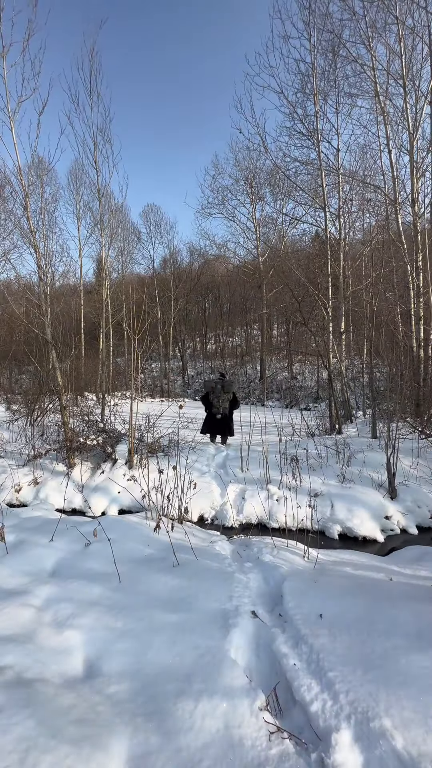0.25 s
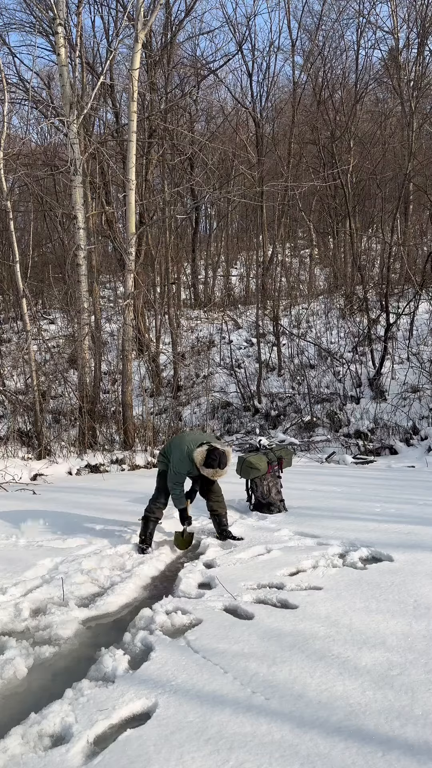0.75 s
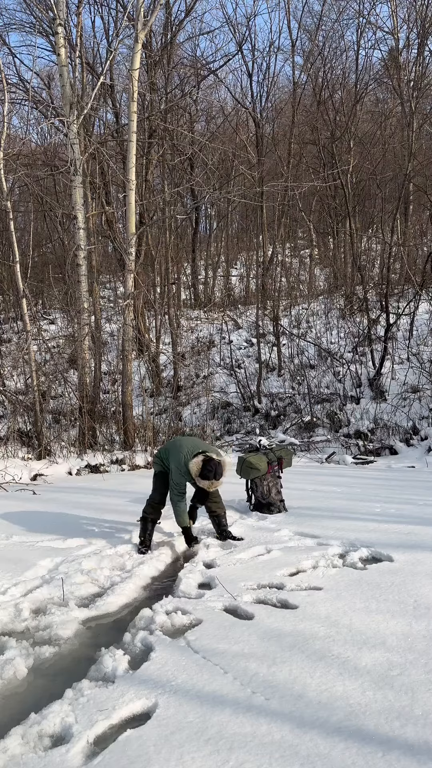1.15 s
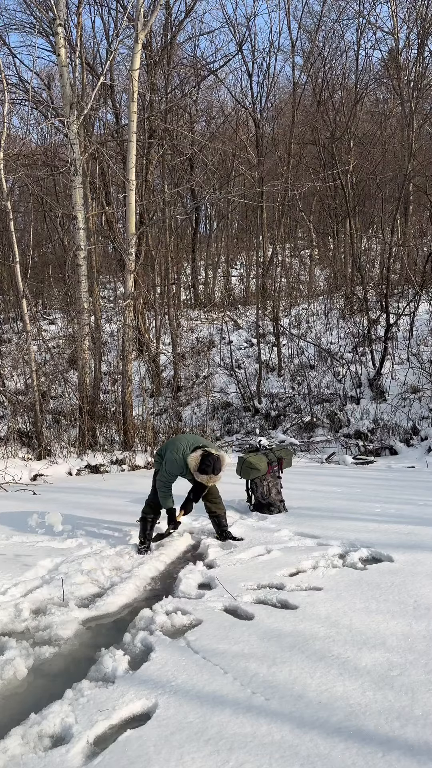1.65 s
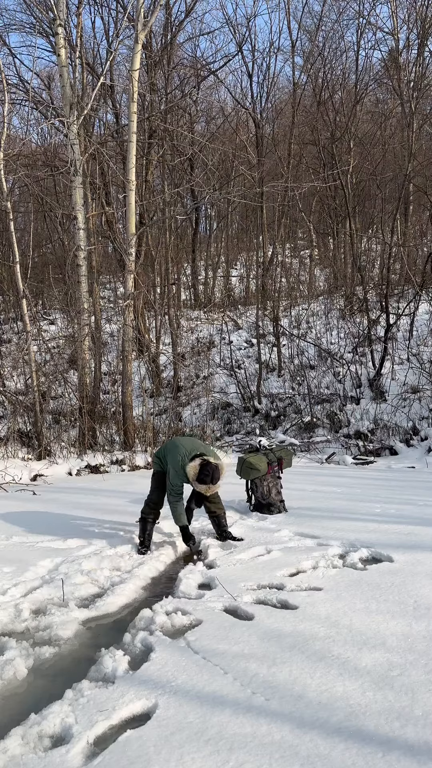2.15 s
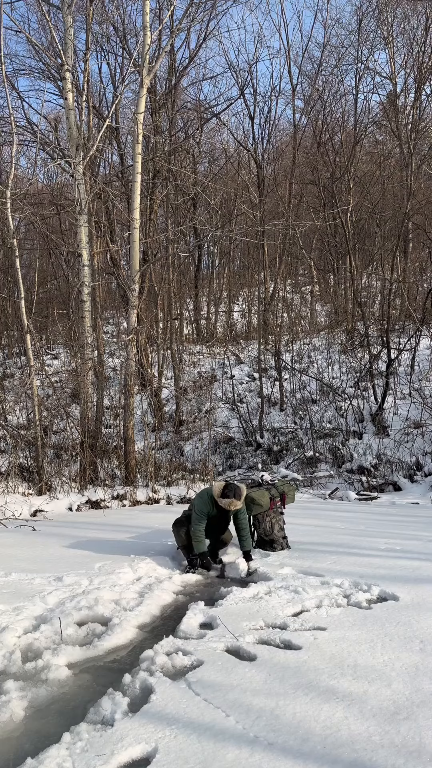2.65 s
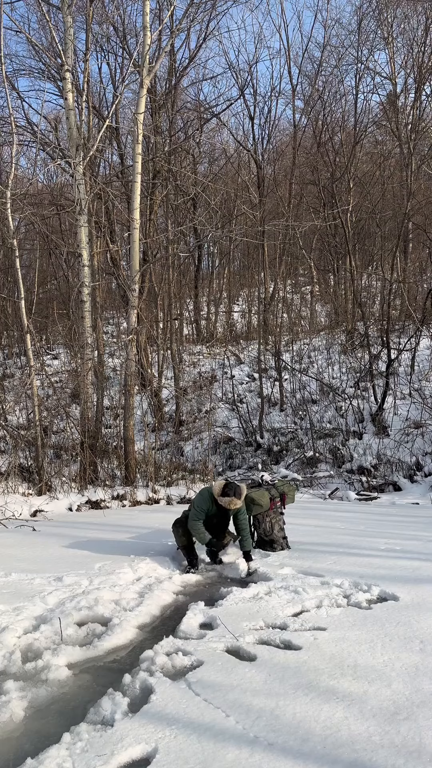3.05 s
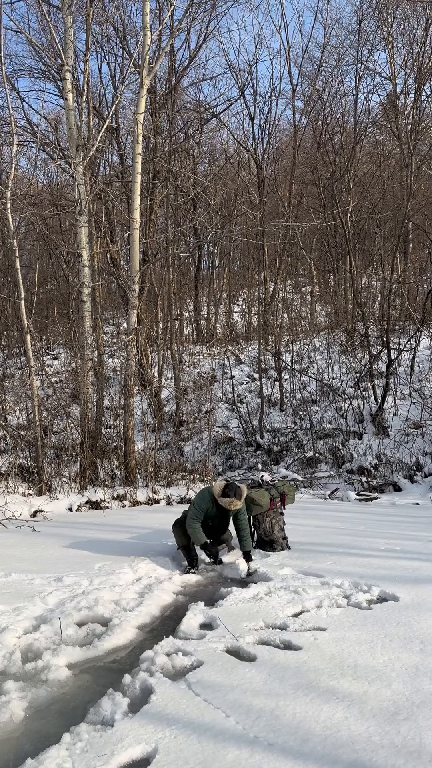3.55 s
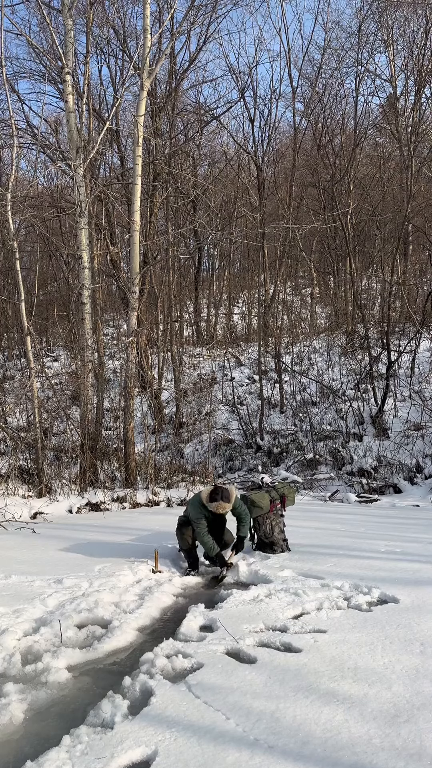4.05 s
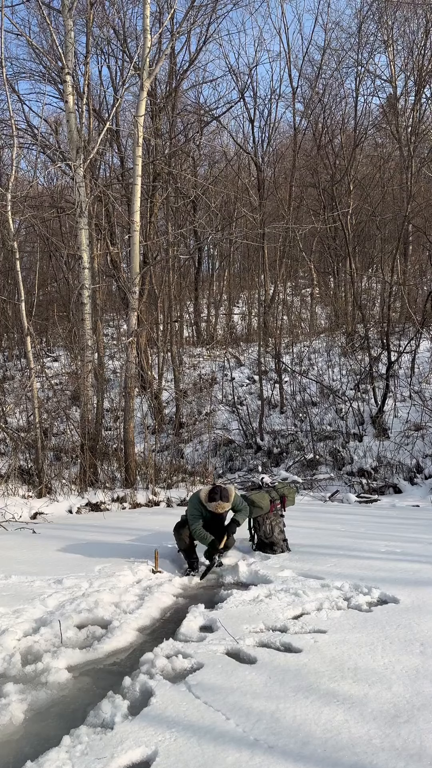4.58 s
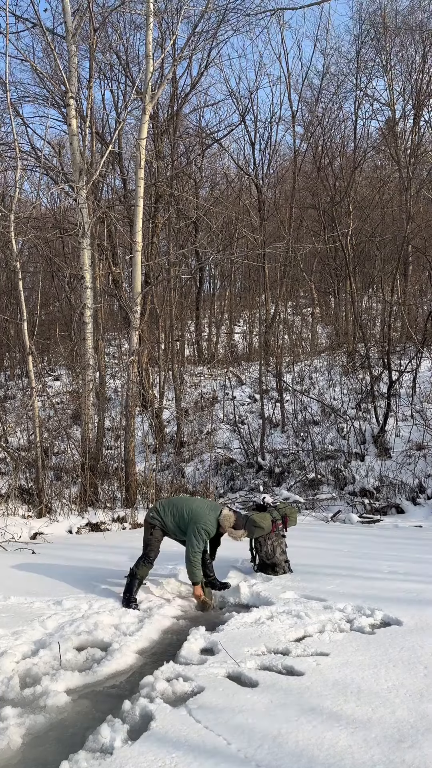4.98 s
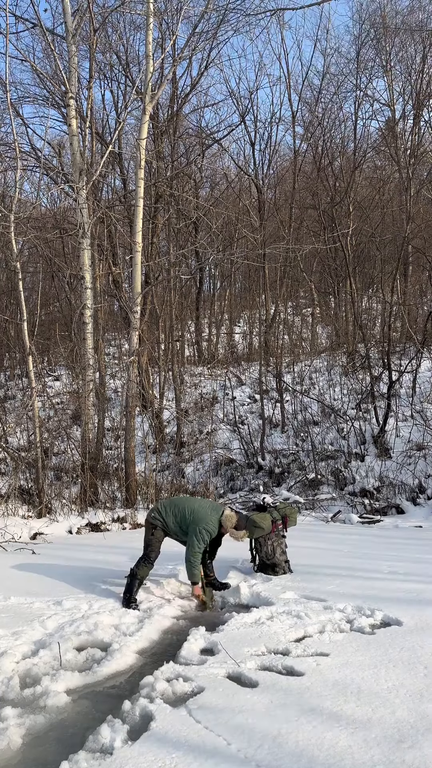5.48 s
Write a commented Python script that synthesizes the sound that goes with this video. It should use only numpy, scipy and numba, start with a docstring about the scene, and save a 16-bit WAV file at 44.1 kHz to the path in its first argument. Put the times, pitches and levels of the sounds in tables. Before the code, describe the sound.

Silence first, then boots and a scoop scrape gritty snow and slush with crackles and small ringing ticks. Two sharp chisel blows hit thick ice, then a third, followed by more scraping and thumps, then two final blows. Open winter woodland, faint tree echo, light wind rumbling on a stereo phone microphone.

```python
"""Chiselling ice on a frozen stream

After a silent moment, boots and a scoop scuff through snow and slush as hissing grit and flickering resonances.
Then a chisel strikes the ice five times: each blow crushes ice in a noisy burst and sends a bending wave
through the sheet, treble first and bass last. Chips spray and tick about as short decaying rings.
Light wind, made of coloured noise, rumbles on a two-port phone microphone; the sound is spliced in a few places."""
import sys
import numpy as np
from scipy import signal
from scipy.fft import rfft, irfft
from scipy.io import wavfile
from scipy.ndimage import uniform_filter1d
from numba import njit

SR = 44100
rng = np.random.default_rng(int(sys.argv[2]) if len(sys.argv) > 2 else 0)


def invert_db(x):
    """Field ratio 10**(x/20) for x, a level in decibels (scalar or array-like)."""
    u = np.asarray(x, float) / 20
    return 10 ** u


def persist_wave(psi):
    """Save psi, clipped to +-1, as 16-bit WAV."""
    counts = np.round(np.clip(psi, -1, 1) * 32767).astype(np.int16)
    wavfile.write(sys.argv[1], SR, np.atleast_2d(counts).T)


N = 252252
T = np.arange(N) / SR

# splices, where the level dips briefly: (t/s, ramp on either side/s)
SPLICE_POINTS = [(2.41, 0.012), (3.694, 0.014), (4.699, 0.0095)]
# the edge grinding into the ice, drive ahead of the ice filter:
# (t/s, length/s, level/dB, treble level/dB, edge ring f/Hz, edge ring level/dB)
EDGE_CRUSHES = [(2.685, 0.013, -27.5, -5, 8000, 1), (3.176, 0.0063, -21.5, -4, 8200, 3),
                (3.655, 0.016, -35, 2.5, 4880, 9.5), (4.859, 0.015, -27, -3.5, 4340, 6.5),
                (5.368, 0.01, -25, -0.5, 9200, 8)]


def level(x, db):
    """Scale to an rms level."""
    return x * invert_db(db) / np.sqrt(np.mean(x ** 2))


def gain(points, size):
    """Spectrum of (f/Hz, level/dB) points on the bins of a transform."""
    hz, db = np.transpose(points)
    bins = np.fft.rfftfreq(size, 1 / SR)
    return invert_db(np.interp(np.log(bins + 1), np.log(hz), db))


def equalize(x, points):
    """Filter by (f/Hz, level/dB) points."""
    size = x.shape[-1]
    return irfft(rfft(x) * gain(points, size), size)


def colour(x, points):
    """Filter by (f/Hz, level/dB) points, rms 1."""
    return level(equalize(x, points), 0)


def band(x, lo_hz, hi_hz):
    """Band-pass."""
    sections = signal.butter(2, [lo_hz, hi_hz], "bandpass", fs=SR, output="sos")
    return signal.sosfilt(sections, x)


def curves(table):
    """Columns of a table, one value a sample."""
    s, *columns = np.transpose(table)
    return [np.interp(T, s, c) for c in columns]


def walk(rate):
    """Random levels held 1 / rate s and slewed twice; spread near 1."""
    k = int(SR / rate)
    held = np.repeat(rng.standard_normal(N // k + 1), k)
    return 1.4 * uniform_filter1d(uniform_filter1d(held, k), k)[:N]


def grit(size, rate, spread_db):
    """Random clicks, rate a second, a few far larger than the rest."""
    when, sign, strength = rng.random((size, 3)).T
    return (when < rate / SR) * np.sign(sign - .5) * invert_db(-spread_db * np.log(1 - strength))


@njit
def add(out, start, hz, cycles, size, glide):
    """Add decaying rings whose pitch slides."""
    for k in range(len(start)):
        z, turn = size[k] + 0j, 2 * np.pi * hz[k] / SR
        length = int(cycles[k] * SR / hz[k])  # samples until 60 dB down
        for i in range(start[k], min(start[k] + length, len(out))):
            z *= np.exp(1j * turn * (1 + glide * (i - start[k]) / length) - 6.9 / length)
            out[i] += z.imag


def fade(s, t60_s):
    """Exponential fall from time s on."""
    return np.exp(-np.log(1000) * np.maximum(T - s, 0) / t60_s)


def until_splice(s):
    """On from time s to the next splice, which ends all that came before."""
    later = [cut for cut, _ in SPLICE_POINTS if cut > s]
    return (T > s) & (T < min(later + [np.inf]))


def opposed(x):
    """The same signal in opposite polarity left and right."""
    return x * np.array([[1], [-1]])


def wide(x, side_db):
    """Left and right from a shared and an opposed signal."""
    return x[0] + invert_db(side_db) * opposed(x[1])


def ports(x, *extra_turns):
    """The sound reaches the two ports by different paths, so the treble comes in opposite phase."""
    # phase of left ahead of right: (f/Hz, half turns)
    path_turn = [(0, 0), (2400, 0), (3200, .14), (3900, 0), (6000, -.03), (6800, -.15), (7700, -.42),
                 (9100, -.62), (10200, -.72), (10500, -1), (13600, -1), (15400, -1.5), (16500, -1.1)]
    f = np.fft.rfftfreq(N, 1 / SR)
    half = np.pi / 2 * sum(np.interp(f, *np.transpose(turn)) for turn in (path_turn, *extra_turns))
    return irfft(rfft(x) * np.exp(1j * opposed(half)), N)


def air():
    """Coloured background noise, partly unlike left and right, steps in level at the splices."""
    # noise colour: (f/Hz, level per Hz/dB)
    air_colour = [(25, -14), (55, -18), (125, -6), (270, -1), (420, -1.5), (800, -11.5), (1200, -16.5),
                  (2300, -22), (4300, -20), (8500, -34), (12000, -50), (15500, -69), (16500, -69)]
    # unlike share of the noise: (f/Hz, level/dB)
    side_colour = [(100, -40), (600, 3.5), (1100, 4), (1900, -19), (2600, 7.5), (4000, -0.5), (6000, 3.5),
                   (8000, -22), (16000, 0)]
    # noise in each piece between splices: (level/dB)
    piece_db = [-68.5, -70, -66.5, -66]
    piece = np.searchsorted([s for s, _ in SPLICE_POINTS], T)
    noise = colour(rng.standard_normal((2, N)), air_colour) * invert_db(np.array(piece_db)[piece])
    return ports(noise[0]) + opposed(equalize(noise[1], side_colour))


def wind():
    """Gusts rumble on the ports, partly unlike left and right; a rustle lies above them."""
    # wind strength: (t/s, rumble level/dB, rustle level/dB)
    gusts = [(.56, -66, -65), (.85, -71.5, -67.5), (1.08, -85, -60), (1.38, -81, -67), (1.77, -69, -65),
             (2.1, -77, -58.5), (2.3, -57.5, -59.5), (2.5, -67, -62), (2.81, -65, -61), (3.08, -60.5, -61),
             (3.27, -62, -62), (3.55, -65.5, -61), (3.92, -60, -64), (4.1, -55.5, -60.5),
             (4.29, -61, -61.5), (4.55, -64.5, -62), (4.75, -62, -61), (5.1, -64, -60.5), (5.3, -63.5, -62),
             (5.55, -58.5, -59.5), (5.72, -61, -63.5)]
    rumble_db, rustle_db = curves(gusts)
    rumble = colour(rng.standard_normal((2, N)), [(30, -18), (50, -9.5), (90, -11), (150, -21.5), (300, -57.5)])
    rustle = colour(rng.standard_normal((2, N)),
                    [(90, -4), (150, -4.5), (300, -3.5), (500, -9), (800, -25), (1500, -81)])
    # random swings round the wind level
    rumble = rumble * invert_db(3.5 * walk(10))
    rustle = rustle * invert_db(1.5 * walk(20))
    return invert_db(rumble_db) * wide(rumble, -2.5) + invert_db(rustle_db) * wide(rustle, -9.5)


def tail(gap_s, t60_s):
    """A random decaying echo response of energy 1."""
    t = np.arange(SR // 2) / SR
    h = rng.standard_normal(len(t)) * (t >= gap_s) * np.exp(-np.log(1000) * t / t60_s)
    return h / np.sqrt(np.sum(h ** 2))


def trees(near):
    """Scattered echo from the trees: a part common to both ports and a part opposed left and right."""
    common = invert_db(-23.0) * signal.fftconvolve(near, tail(0.00043, 0.3))[:N]
    sides = invert_db(-30.5) * signal.fftconvolve(near, tail(0.0018, 0.28))[:N]
    sides = equalize(sides, [(120, 20), (1000, -9), (4000, 12.5), (12000, 2)])
    return ports(common) + opposed(sides)


def thumps():
    """Steps, bumps and strong wind gusts felt as bass: slow swings that die in a few cycles."""
    # bass swings ahead of the swell and band-pass: (t/s, peak level/dB, f/Hz, t60/s)
    swings = [(0.661, -45, 56.6, 0.16), (1.121, -41.5, 69.4, 0.087), (1.291, -42.5, 68, .12),
              (1.69, -44, 71, 0.24), (1.441, -44.5, 59, 0.15), (1.87, -47, 71, 0.08), (1.948, -38, 93, .1),
              (2.297, -33.5, 54, 0.16), (3.769, -44, 58.7, 0.11), (4.023, -39.5, 56.9, 0.5),
              (4.36, -36.5, 66, .15), (4.47, -39, 73, 0.13), (4.507, -26, 147, 0.069),
              (4.799, -41, 55, 0.075), (5.4, -31.5, 40, 0.15), (5.469, -28.5, 59, .13)]
    swell_s = 0.01  # a swing builds up this long
    s, db, hz, t60 = np.transpose(swings)
    out = np.zeros(N)
    add(out, (s * SR).astype(np.int64), hz, np.maximum(hz * t60, 1), invert_db(db), 0.)
    swell = np.hanning(int(swell_s * SR)) / (swell_s * SR / 2)
    return band(signal.fftconvolve(out, swell)[:N], 43, 360)


def motion():
    """Strength of hiss, high rasp and low rasp: shuffling, drags and spray add up in power."""
    # shuffling of boots and loose snow that swells and dies away, with a scrape just before the first splice:
    # (t/s, hiss level/dB, rasp over hiss level/dB)
    shuffle = [(.56, -58, -8), (.84, -71, -13.5), (.9, -57.5, -9), (1.2, -53, -2.5), (1.36, -53.5, -6.5),
               (1.52, -50, -6.5), (1.58, -59, -33), (1.75, -57.5, -26), (1.86, -58, -10),
               (1.93, -50.5, -9.5), (2.2, -53, -7), (2.31, -59.5, -3), (2.404, -45.5, -21),
               (2.42, -89, 11.5), (3.0, -69.5, -9.5), (3.4, -77.5, 5.5), (4.2, -71, -11), (4.33, -70.5, -7),
               (4.68, -74.5, 3.5), (5.05, -77.5, 6.5), (5.14, -64, -3), (5.25, -65.5, -11),
               (5.355, -88, 10), (5.58, -87, 10), (5.7, -64.5, -6.5)]
    # drags of scoop and boots:
    # (start t/s, hold/s, hiss level/dB, high rasp over hiss level/dB, low rasp over hiss level/dB)
    drags = [(0.845, 0.012, -55.5, -23, -32), (0.901, 0.095, -41.5, -8.5, -6.5),
             (0.976, 0.071, -42, -2, -2), (1.041, 0.09, -57.5, 9, 10.5), (1.473, 0.033, -54, -4.5, -2),
             (1.593, 0.051, -52, -8.5, -25), (1.658, 0.013, -49.5, -8.5, -13.5),
             (1.941, 0.054, -44.5, -1, -5.5), (2.028, 0.082, -44, 2.5, -1), (2.324, 0.0051, -55.5, 6.5, -3),
             (2.91, 0.0081, -66, -5, -14), (2.954, 0.0064, -62.5, -31, -22), (3.465, 0.027, -66.5, 3, 0),
             (3.714, 0.052, -56.5, -10, -28), (3.852, 0.011, -59, -1, -8), (3.933, 0.038, -55.5, 4, 2),
             (3.976, 0.047, -51, 5.5, 0.5), (4.085, 0.018, -71, -8, 4), (4.345, 0.067, -53, -13.5, -20),
             (4.421, 0.16, -58, -15, -18), (5.625, .04, -71, -13, -11)]
    low_over_high_db, patchy_db = -5, 1.5  # low rasp against high rasp; unevenness
    attack_s, swell_share = 0.0039, 0.16  # a longer drag swells in more slowly, by a share of its hold
    settle, drop_s, settle_t60_s = invert_db(-5.5), 0.0053, 0.57  # a drag lets go quickly, then the snow settles
    spray_db, spray_high_db, spray_low_db, spray_t60_s = -56, -3.5, 2, 0.59  # chips fly after every blow

    def three(high_db, low_db):
        """Gains of hiss, high rasp and low rasp."""
        return invert_db(np.array([[0], [high_db], [low_db]]))

    hiss_db, rasp_db = curves(shuffle)
    uneven_db = patchy_db * np.array([walk(25.01) for _ in range(3)])
    power = invert_db(hiss_db + uneven_db + [0 * T, rasp_db, rasp_db + low_over_high_db]) ** 2
    for s, hold_s, db, high_db, low_db in drags:
        end = s + attack_s + hold_s
        rise = np.clip((T - s) / (attack_s + swell_share * hold_s), 0, 1)
        quick_drop = fade(end, np.log(1000) * drop_s)  # drop_s as time constant
        shape = rise * (settle * fade(end, settle_t60_s) + (1 - settle) * quick_drop)
        power = power + (invert_db(db) * shape * until_splice(s) * three(high_db, low_db)) ** 2
    for s, *_ in EDGE_CRUSHES:
        spray = invert_db(spray_db) * until_splice(s) * fade(s, spray_t60_s)
        power = power + (spray * three(spray_high_db, spray_low_db)) ** 2
    return np.sqrt(power)


def resonate(x, modes, flicker_db):
    """Drive resonances whose strengths flicker apart; rms 1."""
    rings = [invert_db(db + flicker_db * walk(30)) * band(x, hz - w / 2, hz + w / 2) for hz, w, db in modes]
    return level(sum(rings), 0)


def chips(strength):
    """Tiny chips tick at random, louder where more snow moves."""
    chips_per_s, lowest_hz, octaves = 60., 1780, 1.56
    smallest_db, spread_db = -1.5, 2.5  # over the hiss strength
    when, pitch, size = rng.random((600, 3)).T
    start = (np.cumsum(-np.log(1 - when)) / chips_per_s * SR).astype(np.int64)
    size = (start < N) * invert_db(smallest_db - spread_db * np.log(1 - size))
    out = np.zeros(N)
    add(out, start, lowest_hz * 2 ** (octaves * pitch), np.full(len(start), 25.), size, .04)
    return out * strength


def scuff():
    """Dense crystal grit hisses and drives the hollows that it scrapes over; single crumbs crackle on top."""
    # hiss colour: (f/Hz, level per Hz/dB)
    hiss_colour = [(500, -44), (1200, -27), (2200, -15), (2800, -9), (4800, -1.5), (6500, -2.5), (8500, 4),
                   (10000, 4), (11000, -9), (13500, -6), (15500, -3.5), (16500, -46.5)]
    # hollows in the snow crust and the scoop that colour the rasp: (f/Hz, width/Hz, level/dB)
    low_hollows = [(616, 340, 2.5), (708, 166, 3.5), (848, 188, 5), (1050, 182, 8), (1250, 190, 6.5)]
    high_hollows = [(1500, 270, 2), (1726, 145, 2.5), (1968, 278, 2.5), (2343, 176, 1.5), (2490, 217, -6)]
    # the scoop sings while it drags: (start t/s, end t/s, f/Hz, level/dB)
    singing = [(1.96, 2.115, 1075, -49), (1.925, 2.015, 2300, -48.5), (.95, 1.0, 2050, -46),
               (4.085, 4.12, 1075, -51), (4.03, 4.05, 1200, -33.5)]
    strength, high, low = motion()
    crystals = (grit(N, 4000, 3.2) + 1.25 * rng.standard_normal(N)) * invert_db(0.91 * walk(60))
    crumb = np.exp(-np.arange(200) / 95.0) * rng.standard_normal(200)
    crumbs = signal.fftconvolve(grit(N, 90, 2.4), crumb)[:N]
    crystals = level(crystals, 0) + level(crumbs, -9)
    hiss = colour(crystals, hiss_colour)
    hiss = hiss / np.std(band(hiss, 2800, 10000))  # the hiss level counts in this band
    rasp = high * resonate(crystals, high_hollows, 2.0) + low * resonate(crystals, low_hollows, 2.2)
    out = strength * hiss - rasp + chips(strength)
    for start, end, hz, db in singing:
        swell = np.clip(np.minimum(T - start, end - T) / 0.0082, 0, 1)
        out = out + swell * level(band(crystals, hz - 22, hz + 22), db)
    return out


def ticks():
    """Each landing lump rings at its own pitch and snaps in the treble."""
    # lumps and chips landing: (t/s, ring level/dB, ring f/Hz, snap level/dB)
    landings = [(.568, -48, 2180, -67), (.625, -52, 3420, -65), (0.72, -54, 4600, -52),
                (.568, -58, 1280, -72), (.811, -71, 590, -54), (.908, -42, 2300, -35),
                (.922, -38.5, 2220, -39), (.956, -33, 2080, -34), (1.229, -45, 2140, -52),
                (1.275, -44.5, 1050, -52), (1.376, -41, 2410, -37.5), (1.482, -43, 1100, -36),
                (1.504, -40.5, 1530, -52), (1.523, -45.5, 1250, -45), (1.548, -62, 2520, -41),
                (1.616, -50, 2080, -48), (1.633, -41.5, 1765, -31), (1.64, -41, 2430, -32),
                (1.745, -46, 1800, -42.5), (1.795, -52, 2150, -43), (1.834, -53, 1500, -47),
                (1.953, -31.5, 2130, -30.5), (2.251, -41.5, 2010, -49), (2.323, -43, 1850, -33.5),
                (2.354, -45, 1310, -39), (2.362, -38, 2045, -35.5), (2.402, -48, 2680, -33),
                (2.484, -66, 704, -54), (3.013, -69, 890, -53), (3.31, -71, 2200, -57),
                (3.404, -52, 1640, -61), (3.483, -41.5, 2040, -45.5), (3.597, -79, 2080, -61),
                (3.851, -50, 2305, -47), (3.866, -46, 2364, -63), (3.944, -42.5, 2210, -70),
                (3.992, -28.5, 1720, -36), (4.001, -35, 1700, -52), (4.014, -30, 2330, -38),
                (4.031, -33, 2300, -41), (4.044, -41, 620, -50), (4.087, -40, 1066, -51),
                (4.119, -50.5, 673, -49.5), (4.167, -52, 1400, -69), (4.238, -66, 865, -46.5),
                (4.355, -47.5, 2280, -61), (4.437, -43.5, 3700, -45), (4.468, -58, 2200, -49),
                (4.937, -45.5, 2550, -46.5), (5.12, -59, 2410, -53), (5.146, -56, 1850, -48.5),
                (5.177, -43, 2110, -58), (5.198, -58, 2380, -41.5), (5.246, -65, 1200, -45.5),
                (5.595, -65, 696, -60), (5.607, -61, 697, -50), (5.615, -55, 2490, -51),
                (5.629, -62, 670, -48)]
    s, ring_db, hz, snap_db = np.transpose(landings)
    start = (s * SR).astype(np.int64)
    out = np.zeros(N)
    add(out, start, hz, np.full(len(s), 55), invert_db(ring_db), .04)  # gone after 55 cycles
    noise = colour(rng.standard_normal((len(s), 600)),
                   [(1200, -13), (3000, -7), (9000, 1.5), (11000, 5), (16000, -16)])
    snap = np.exp(-np.arange(600) / 190.0) * noise
    for i, g, burst in zip(start, invert_db(snap_db), snap):
        out[i:i + 600] += g * burst
    return out


def blows():
    """Ice crushes round one main crack; the bending sheet delays each pitch by one over its square root."""
    # ice under the edge: (f/Hz, level per Hz/dB)
    ice = [(50, -32), (120, -2.5), (250, 10.5), (440, 10), (700, 6), (1030, 6), (1400, 4), (2100, 5.5),
           (3000, -3.5), (4800, 1), (6500, -5.5), (8200, 3.5), (10500, -6), (15000, -13.5), (16500, -24)]
    # main crack of each blow, drive ahead of the filters: (time after the edge meets ice/s, crack level/dB,
    # knock f/Hz, knock level/dB, boom f/Hz, boom level/dB)
    cracks = [(0.0034, -16, 520, -24, 114, -36), (.001, -19.5, 650, -20, 155, -34.5),
              (.006, -21, 1126, -21, 142, -29.5), (0.00211, -19.5, 1990, -25, 240, -62),
              (0.00188, -21.5, 2380, -21.5, 173, -39.5)]
    bend_s = 0.0043  # bending delay is bend_s * sqrt(1000 / f), counted from the arrival of 9 kHz
    lead = 256  # samples of room for pitches that arrive before 9 kHz
    out, size = np.zeros(N), 8192
    t, f = np.arange(size) / SR, np.fft.rfftfreq(size, 1 / SR)
    bend = np.exp(-2j * np.pi * bend_s * (2 * np.sqrt(1000 * f) - f * np.sqrt(1000 / 9000)))
    for edge, main in zip(EDGE_CRUSHES, cracks):
        s, crush_s, crush_db, treble_db, edge_hz, edge_db = edge
        crack_s, crack_db, knock_hz, knock_db, boom_hz, boom_db = main
        # splinters keep breaking until the edge stops, then die fast
        push = np.clip(t / 0.00065, 0, 1) ** 2 * np.exp(-np.maximum(t - 0.84 * crush_s, 0) / 0.0034)
        crush = push * (grit(size, 8000, 2.03) + .5 * rng.standard_normal(size)) * invert_db(crush_db)
        late = np.maximum(t - crack_s, 0)
        crack = (t >= crack_s) * np.exp(-late / 0.0029) * np.sign(rng.standard_normal(size)) * invert_db(crack_db)
        knock = np.exp(-late / 0.0023) * np.sin(2 * np.pi * knock_hz * late) * invert_db(knock_db)
        boom = np.exp(-late / 0.0093) * np.sin(2 * np.pi * boom_hz * late) * invert_db(boom_db)
        bite = gain(ice, size) * gain([(2500, 0), (3500, treble_db)], size)
        # broad ring of the steel edge
        bite = bite * invert_db(edge_db * np.exp(-((f / edge_hz - 1) / .09) ** 2))
        # a blow that shakes the sheet less is lighter in the low middle too
        bite = bite * gain([(450, 0.23 * (boom_db + 30.0)), (750, 0)], size)
        body = rfft(knock + boom) * gain([(30, -18), (80, 0.5)], size)
        wave = irfft((rfft(crush + crack) * bite + body) * bend, size)
        i = int(s * SR) - lead
        out[i:i + size] += np.roll(wave, lead)
    return out


def scene():
    """Near sounds with a little echo from the trees pass the ports; wind blows straight on them."""
    # the blows come from another side: (f/Hz, extra half turns)
    blow_turn = [(500, 0.022), (2000, 0), (4400, 0.16), (6500, 0), (10000, 0.042), (11000, 0.13),
                 (12500, 0), (16500, 0.079)]
    snow, chisel = scuff() + ticks(), blows()
    near = ports(snow + thumps()) + ports(chisel, blow_turn)
    return air() + wind() + trees(snow + chisel) + near


def roll_off(x):
    """The treble ends steeply here."""
    return signal.sosfilt(signal.butter(12, 16500, fs=SR, output="sos"), x)


def record(dry):
    """Silence until the start, brief dips at the splices, the top cut off."""
    start_s, top_hz = 0.5596, 15650
    gate = np.clip((T - start_s) / 0.008, 0, 1)
    for s, dip_s in SPLICE_POINTS:
        gate = gate * np.clip(np.abs(T - s) / dip_s, 0, 1)
    low_pass = signal.ellip(8, .2, 60, top_hz, fs=SR, output="sos")
    mix = signal.sosfilt(low_pass, dry * gate)
    return roll_off(mix)


dry = scene()
out = record(dry)
persist_wave(out)
```